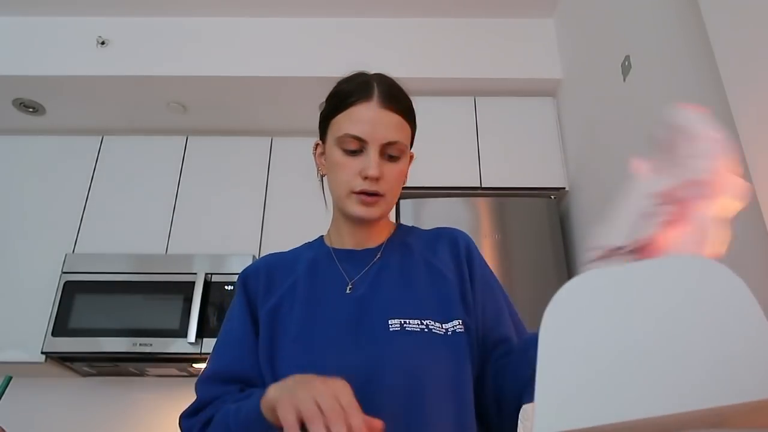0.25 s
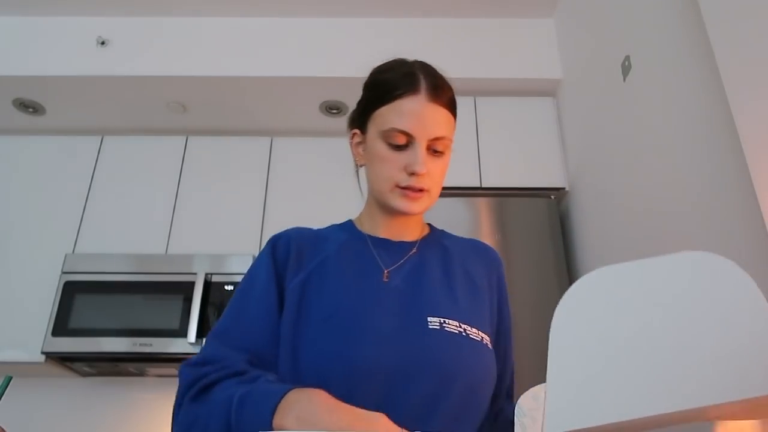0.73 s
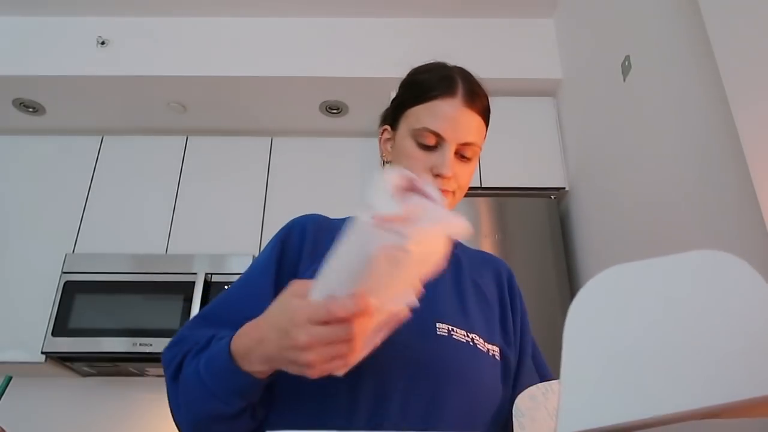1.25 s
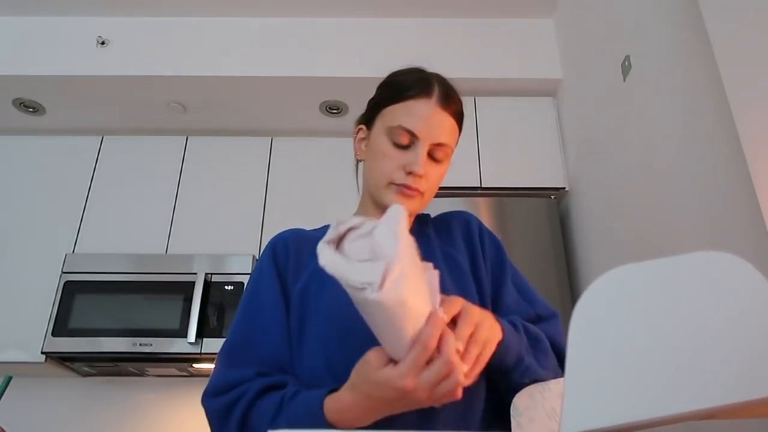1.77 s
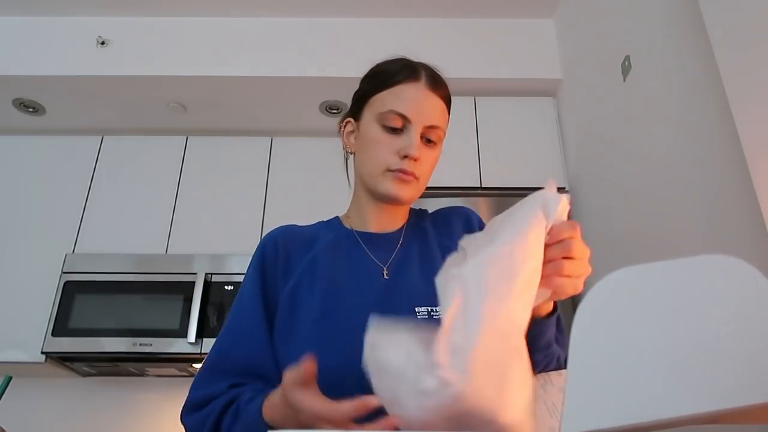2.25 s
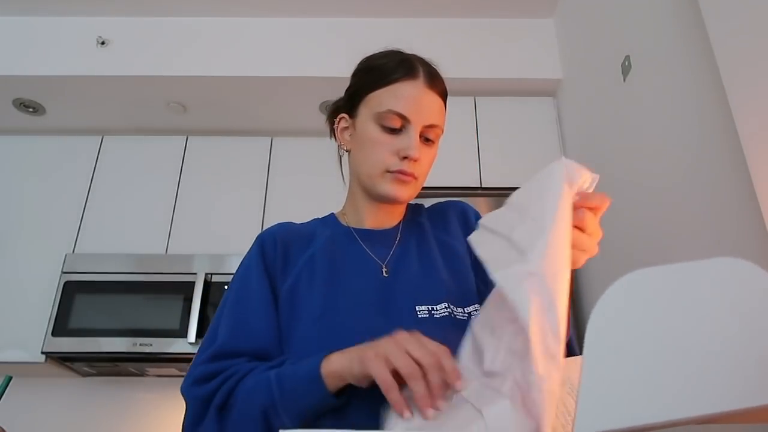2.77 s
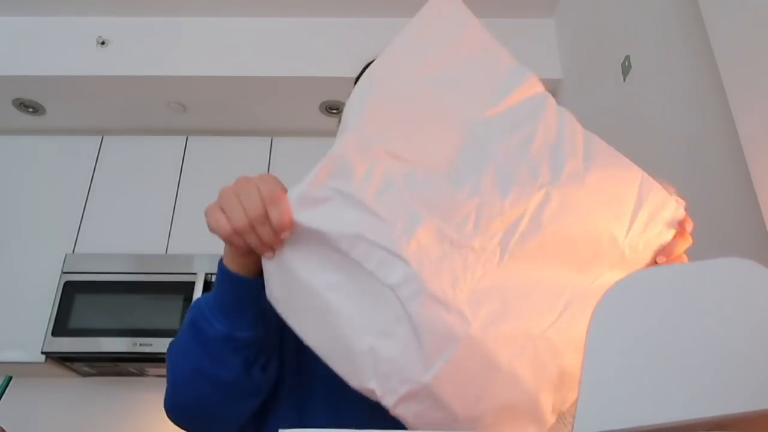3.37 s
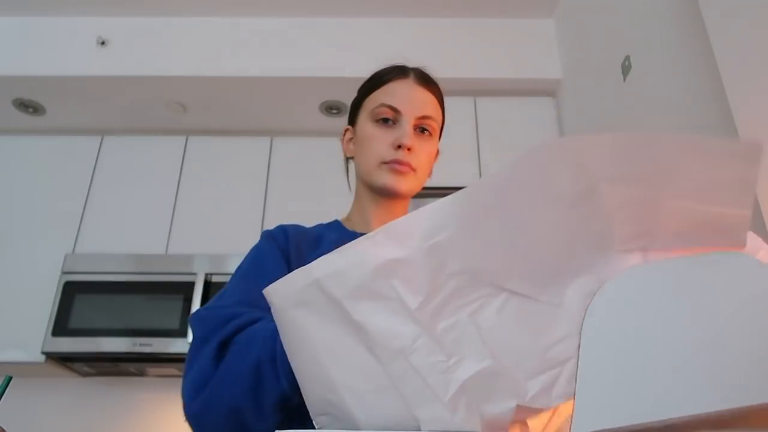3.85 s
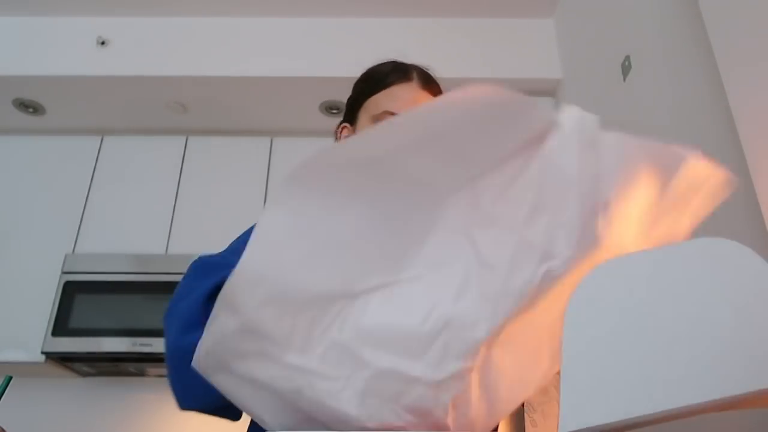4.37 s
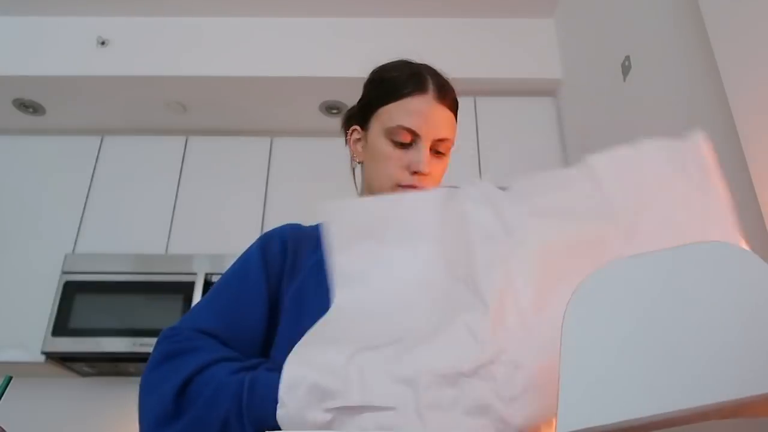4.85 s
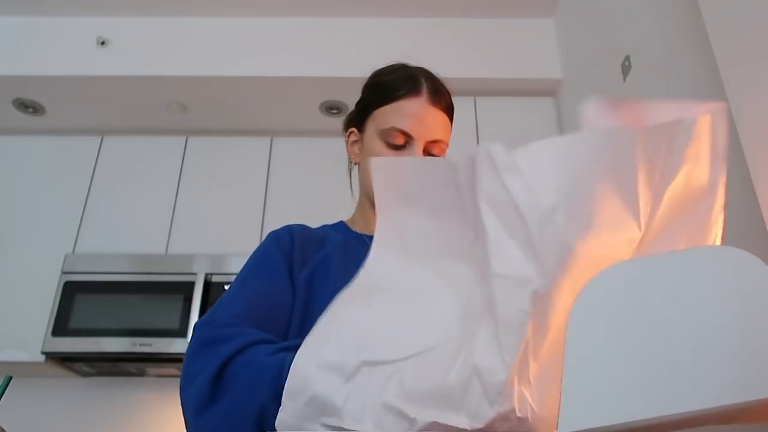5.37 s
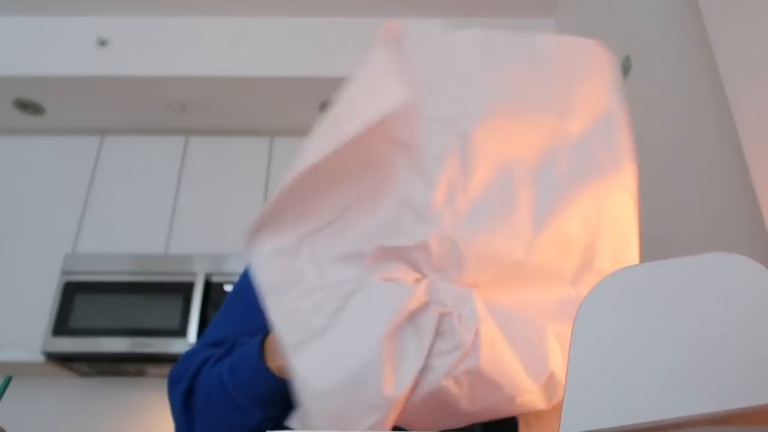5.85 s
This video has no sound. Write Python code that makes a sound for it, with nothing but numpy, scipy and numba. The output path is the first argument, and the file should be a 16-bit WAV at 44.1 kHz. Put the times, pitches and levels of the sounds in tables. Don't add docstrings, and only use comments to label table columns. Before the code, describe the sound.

Crisp paper crinkling in a small hard-walled kitchen, recorded close in stereo on a phone. Uneven bursts of crackle and fine fizz start with a grip and lift, thicken into loud crumpling with ringing crease snaps, then turn to wide sheet flapping, hollow pops and a faint box knock. It thins to sparse ticks, then another balling burst. Steady low refrigerator and ventilation noise fills the gaps.

```python
import sys
import numpy as np
from scipy import signal
from scipy.fft import rfft, irfft, next_fast_len
from scipy.io import wavfile
from scipy.ndimage import uniform_filter1d
from numba import njit

SR = 44100
rng = np.random.default_rng(int(sys.argv[2]) if len(sys.argv) > 2 else 0)


def magnitude_from_level(level_db):
    exponent = np.asarray(level_db, float) / 20
    return 10 ** exponent


def pcm_store(signal):
    levels = np.round(np.clip(np.atleast_2d(signal), -1, 1) * 32767)
    wavfile.write(sys.argv[1], SR, levels.astype(np.int16).T)


N = 269583


def on_log(table, hz):
    point_hz, value = np.transpose(table)
    return np.interp(np.log(np.maximum(hz, 1)), np.log(point_hz), value)


def shape(x, table, rule):
    size = next_fast_len(N)
    gain = rule(on_log(table, np.fft.rfftfreq(size, 1 / SR)))
    return irfft(rfft(x, size) * gain, size)[..., :N]


def unit(x):
    return x / np.sqrt(np.mean(x ** 2))


def walk(rate_hz):
    hold = int(SR / rate_hz)
    return uniform_filter1d(np.repeat(rng.standard_normal(N // hold + 1), hold), hold)[:N]


@njit
def ring(n, start, pole, size, place):
    out = np.zeros((2, n))
    for g in range(len(start)):
        fade = 1 - abs(pole[g])
        push, y, z = size[g] * fade ** 2 * np.e ** 2 / 2 + 0j, 0j, 0j
        for i in range(start[g], min(n, start[g] + int(11 / fade))):
            z = z * pole[g] + y
            y = y * pole[g] + push
            push *= pole[g]
            out[0, i] += z.imag
            out[1, i] += z.imag * place[g]
    return out


def grains(s, hz, t60_s, size):
    hz = np.clip(hz, 40, SR / 2.4)
    pole = np.exp(2j * np.pi * hz / SR - 1.764 * np.log(1000) / (t60_s * SR))
    return ring(N, (s * SR).astype(np.int64), pole, size, rng.standard_normal(len(hz)))


def kitchen():
    # frequency in Hz, level in dB per Hz.
    air_spectrum = [(18, -56), (30, -49), (222, -4), (364, -2), (716, -17.5), (905, -7), (3500, -28),
                    (4200, -26), (4540, -42), (10200, -80), (15000, -69)]
    # frequency in Hz, level in dB rms.
    hum_lines = [(73, -66), (118.4, -59), (215.3, -56.5)]
    air_db = -41.5 + 0.87 * walk(3.05)
    air = unit(shape(rng.standard_normal((2, N)), air_spectrum, magnitude_from_level)) * magnitude_from_level(air_db)
    t = np.arange(N) / SR
    hum = 0
    for hz, db in hum_lines:
        hum = hum + np.sqrt(2) * magnitude_from_level(db + 3.2 * walk(14)) * np.sin(2 * np.pi * hz * t)
    return air + hum


def gestures(table, rise_db_s, fall_db_s):
    rest_db, rest_rel_db = -45.5, -11
    t = np.arange(N) / SR
    power = magnitude_from_level(2 * rest_db) * magnitude_from_level([[0], [2 * rest_rel_db]])
    for s, hold_s, db, rel_db in table:
        rise_db = rise_db_s * np.maximum(s - t, 0)
        fall_db = fall_db_s * np.maximum(t - s - max(hold_s, 0), 0)
        power = power + magnitude_from_level(2 * (db - rise_db - fall_db)) * magnitude_from_level([[0], [2 * rel_db]])
    return np.sqrt(power)


def rustle(crackle, fizz, flap, fold):
    # low and high pitch in Hz, grains per s, cycles to fade,
    # size scatter in dB, bunching in dB, patch share 0-1.
    families = [
        (1619, 4960, 2600, 16.6, -0.2, -0.1, 0.25),
        (100, 650, 900, 5, 1.2, 1.2, .15),
        (675, 1544, 1200, 8.8, 2, -1.5, 0.34),
        (4440, 15160, 8000, 30, -0.5, 1.3, 0.43),
    ]
    # frequency in Hz, level in dB per Hz.
    paper_spectrum = [(47, -55), (80, 5), (124, -30), (252, -66), (287, -2.5), (314, -14), (477, -1),
                      (845, -2.5), (1570, -2), (3100, 1), (7490, -8), (10500, -15), (12400, -16),
                      (15500, -29)]
    # time in seconds, favoured pitch in Hz.
    facet_pitch = [(0.0, 2570), (0.19, 2730), (0.25, 1820), (0.32, 3500), (0.42, 1910), (0.52, 3220),
                   (0.85, 1890), (1.54, 2610), (1.63, 3400), (2.33, 3130), (2.44, 2520), (3.14, 3400),
                   (3.74, 2520), (5.54, 2350), (5.64, 1930), (5.67, 2920), (5.74, 3330), (6.1, 3300)]
    facet_db, facet_octaves = 4, 0.96
    burst_db = 2.4 * walk(24)
    out = 0
    for row, gain in zip(families, [crackle, flap, fold, fizz]):
        lo_hz, hi_hz, rate, cycles, scatter_db, bunch_db, patch = row
        when, where, big, long = rng.random((50000, 4))[:int(rate * N / SR)].T
        at = (when * (N - 1)).astype(int)
        hz = lo_hz * (hi_hz / lo_hz) ** where
        focus = .5 + 0.32 * np.tanh(3.2 * walk(45))[at]
        patch_db = 18 * patch * np.exp(-((where - focus) / 0.12) ** 2)
        if lo_hz < 2000 < hi_hz:
            off = np.log2(hz / np.interp(at / SR, *np.transpose(facet_pitch))) / facet_octaves
            patch_db = patch_db + facet_db * np.exp(-off ** 2)
        db = on_log(paper_spectrum, hz) + 10 * np.log10(hz) - scatter_db * np.log(1 - big) + patch_db
        size = magnitude_from_level(db + (burst_db + bunch_db * walk(13))[at])
        plain = grains(at / SR, hz, cycles * (.5 + long) / hz, size)
        out = out + plain / np.std(plain[0]) * gain
    return out


def chance_creases(crackle):
    rate_per_s, rel_db, mid_hz, fizz_db = 8, 10.5, 2900, -41
    when, big, high = rng.random((int(rate_per_s * N / SR), 3)).T
    at = (when * (N - 1)).astype(int)
    db = 20 * np.log10(crackle[at]) + rel_db + 6 * (big - .5)
    hz = mid_hz * 2 ** (1.614 * (high - .5))
    return list(zip(at / SR, db, hz, fizz_db + 0 * db))


def snaps(crackle):
    # time in seconds, peak in dB, pitch in Hz, fizz in dB re peak.
    single = [(0.185, -12, 2830, -29), (0.2448, -9.5, 1840, -41), (0.3047, -13, 2900, -21),
              (0.429, -10, 1760, -24), (0.5202, -8.5, 3740, -11), (0.854, -7.5, 1770, -26),
              (0.9556, -16, 1940, -42), (1.0795, -5, 1900, -34), (1.272, -0.5, 2020, -41),
              (1.3269, -11, 3510, -15), (1.7265, -7, 4200, -28), (1.75, -8, 3440, -38),
              (1.7928, -7.5, 3900, -19), (1.8198, -2, 3360, -29), (1.8616, -3, 3470, -28),
              (1.9365, 0, 3190, -23), (1.9808, -1.5, 3270, -12), (2.1376, 1.5, 3500, -34),
              (2.181, 3.5, 3260, -28), (2.5563, -4.5, 2530, -41), (2.709, -4.5, 3300, -18),
              (2.7444, -8, 2790, -23), (2.933, -5, 3980, -28), (2.9753, 0.5, 3470, -40),
              (3.0016, 4, 3180, -22), (3.1787, 3.5, 3160, -42), (3.223, 0.5, 3260, -48),
              (3.9059, 0.5, 2900, -20), (5.9891, -3, 2200, -14), (6.067, -13, 1670, -35)]
    faint = [(0.3745, -17.5, 2460, -35), (1.7714, -15, 3400, -26), (1.8844, -24, 3640, -18),
             (2.2438, -8, 3200, -14), (2.6226, -14, 3460, -9), (3.573, -6.5, 3520, -26),
             (4.2794, -7.5, 2520, -5), (4.8993, -11, 2460, 0), (5.0292, -26, 2240, -29),
             (5.21, -39, 2420, -10), (5.4294, -16, 3360, -3), (5.4887, -22, 1780, -15),
             (5.749, -5, 3600, -16), (5.9207, -14, 2010, -28), (6.084, -13, 1690, -35)]
    # time in seconds, peak in dB, pitch in Hz.
    thick = [(0.065, -12, 3160), (0.3123, -8, 3530), (0.6475, -20, 1940), (0.8007, -16, 1880),
             (1.01, -3.5, 3270), (1.04, -8, 2460), (1.131, -12, 2600), (1.618, -17, 3200),
             (1.964, -9, 3450), (2.042, -8, 4200), (2.106, 0.5, 3650), (2.1932, -3, 3470),
             (2.286, 0.5, 3060), (2.5925, -13, 2440), (2.867, -2, 2610), (3.058, -8, 2490),
             (3.1168, -5, 3600), (3.289, -8, 3050), (3.3143, -1, 3430), (3.358, -1.5, 3000),
             (3.62, -3, 2600), (3.6454, -4, 2400), (6.0333, -9, 3800)]
    shaken = [(3.9983, -13, 2100), (4.0556, -0.5, 3280), (4.1279, -3.5, 2440), (4.1763, -19, 1700),
              (4.1938, -4, 3160), (4.2272, -15, 2460), (4.346, -17, 2000), (4.5026, -8, 3150),
              (4.558, -16, 3130), (4.6127, -5, 2250), (4.6737, -11, 1930), (4.7805, -23, 1780),
              (4.8084, -9, 3740), (4.8199, -10, 2860), (4.8423, -12, 3040), (4.8648, -6, 2000),
              (4.8907, -11, 2480)]
    balled = [(5.3103, -19, 2140), (5.3493, -12.5, 2000), (5.3637, -17, 2060), (5.3991, -16, 2600),
              (5.439, -13, 3400), (5.4849, -19, 1810), (5.5513, -17, 3440), (5.635, -11, 1760),
              (5.6615, -13, 3440), (5.679, -5, 3960), (5.6884, -9, 1940), (5.7256, -1, 3750),
              (5.798, -9, 3230), (5.8604, -25, 2060), (5.879, -21, 1670), (5.9204, -22, 2070),
              (5.9892, -11, 2290), (6.0316, -3.5, 3650), (6.0671, -13, 2200), (6.0821, -9, 1670)]
    lifted = [(0.5224, -16, 3970), (0.6466, -18, 1990), (0.6974, -8, 2030), (0.7882, -10, 2000),
              (0.801, -20, 1980), (0.815, -9, 3080), (0.8338, -9, 1770), (0.854, -16, 1760),
              (0.907, -15, 1830), (0.955, -22, 1900), (0.977, -14, 2130), (0.994, -13, 1770)]
    plain_fizz_db = -18
    plain = [(*row, plain_fizz_db) for row in [*thick, *shaken, *balled, *lifted]]
    s, db, hz, fizz_db = np.transpose([*single, *faint, *plain, *chance_creases(crackle)])
    out = grains(s + .0006, hz, 17 / hz, magnitude_from_level(db - 7.0))
    for _ in range(7):
        late, off, high = rng.random((len(s), 3)).T
        near_s, near_hz = s + .015 * late ** 1.2 - .0015, hz * 2 ** (0.91 * off - .4)
        out += grains(near_s, near_hz, 25 / hz, magnitude_from_level(db - 14.0 - 6.9 * late))
        fizz_s, fizz_hz = s + 0.0088 * late ** 1.1, 6000 * 2 ** (0.99 * high)
        out += grains(fizz_s, fizz_hz, 0.0023 + 0 * s, magnitude_from_level(db + fizz_db - 11.0))
    return out


def sparks():
    # time in seconds, peak in dB.
    facet_sparks = [(0.406, -26), (0.431, -16), (0.5267, -6), (0.534, -12), (0.6469, -21), (0.6848, -23),
                    (0.7996, -8), (0.8061, -19), (0.9767, -29), (1.0056, -17), (1.039, -12), (1.6227, -29),
                    (1.7265, -20), (1.8193, -15), (1.864, -25), (1.8916, -21), (1.9255, -23), (1.9759, -7),
                    (2.0507, -19), (2.1126, -17), (2.1735, -23), (2.2432, -4.5), (2.2872, -9), (2.396, -15),
                    (2.4079, -11.5), (2.601, -19), (2.8135, -32), (2.825, -10), (2.8539, -15), (2.933, -11),
                    (3.0565, -27), (3.1762, -23), (3.3144, -23), (3.6456, -9), (3.9025, -17), (3.936, -18),
                    (4.0038, -25), (4.0243, -19), (4.0512, -18), (4.1275, -14), (4.2158, -18),
                    (4.2762, -11), (4.348, -13), (4.5032, -17), (4.5605, -21), (4.633, -12), (4.7381, -29),
                    (4.8379, -14), (4.8653, -18), (4.899, -16), (5.029, -25), (5.3842, -22), (5.3966, -13),
                    (5.53, -16), (5.6865, -12), (5.7164, -19), (5.882, -15), (5.9893, -18)]
    s, db = np.transpose(facet_sparks)
    out = 0
    for _ in range(7):
        late, high = rng.random((len(s), 2)).T
        hz = 5000 * 2 ** (1.4 * high)
        out = out + grains(s + .008 * late ** 1.5, hz, 0.0016 + 0 * s, magnitude_from_level(db - 4 - 12 * high))
    return out


def pops():
    # time in seconds, peak in dB, pitch in Hz, air thump in dB re peak.
    panel_pops = [(0.431, -14, 720, -39), (0.519, -17, 670, -28), (0.676, -30, 697, -32),
                  (0.806, -13, 675, -34), (0.955, -21, 533, -36), (0.995, -7.5, 530, -44),
                  (1.274, -20, 950, -25), (1.794, -25, 880, -23), (2.142, -9.5, 587, -41),
                  (2.265, -14, 575, -33), (2.387, -3.5, 603, -4.5), (2.778, -17.5, 606, -34),
                  (2.798, -11, 633, -30), (3.298, -13.5, 522, -41), (3.608, -15, 774, -22),
                  (3.633, -12, 940, -11), (3.932, -15.5, 510, -10), (4.054, -14, 380, -27),
                  (4.093, -5, 294, -28), (4.215, -10, 308, -8), (4.427, -6.5, 750, -26),
                  (4.562, -9.5, 906, -28), (4.586, -9, 340, -34), (4.779, -22.5, 427, -18),
                  (4.835, -11.5, 480, -36), (4.932, -15, 448, -33), (5.1, -6, 584, -27),
                  (5.381, -5, 585, -18), (5.512, -14.5, 524, -21), (5.686, -12, 534, -46)]
    # time in seconds, peak in dB, pitch in Hz.
    fold_thuds = [(0.651, -11, 641), (0.677, -8, 756), (0.699, -12, 610), (0.819, -11, 511),
                  (0.834, -7.5, 530), (0.854, -21, 1520), (0.928, -11, 450), (1.009, -12, 540),
                  (1.033, -11.5, 540), (1.049, -13, 980), (1.083, -11, 754), (1.199, -16, 1380),
                  (3.659, -8, 530), (3.674, -15, 1460), (4.859, -5, 834), (4.879, -8, 842),
                  (4.899, -9, 778), (5.207, -16, 716), (5.408, -11, 560), (5.539, -11.5, 1110),
                  (5.562, -13, 686), (5.63, -18, 755), (5.719, -17, 500), (5.816, -15, 1100)]
    # time in seconds, peak in dB, pitch in Hz, air thump in dB re peak.
    box_knock = (4.088, -17, 290, -25)
    pop_t60_s, box_t60_s = 0.019, .156
    thuds = [(s, db - 4, hz, -40) for s, db, hz in fold_thuds]
    s, db, hz, thump_db = np.transpose([*panel_pops, *thuds, box_knock])
    out = grains(s, hz, np.append(pop_t60_s + 0 * s[1:], box_t60_s), magnitude_from_level(db - 1.5))
    out += grains(s, 150 + 0 * s, 0.027 + 0 * s, magnitude_from_level(db + thump_db - 5.0))
    for _ in range(4):
        late, off = rng.random((len(s), 2)).T
        near_hz = hz * 2 ** (1.97 * off - 1.1)
        out += grains(s + 0.015 * late ** 1.478, near_hz, 0.018 + 0 * s, magnitude_from_level(db - 12.0))
    return out


def cracks():
    # time in seconds, peak in dB, pitch in Hz.
    dry_cracks = [(0.956, -26, 1890), (1.0104, -2, 2000), (1.0924, 1.5, 2220), (1.1474, -5, 2400),
                  (1.1982, -4, 2000), (1.2337, -2, 3300), (1.258, -9, 1790), (1.329, -9, 3650),
                  (1.3778, -18, 3350), (1.561, -27, 1870), (1.7495, -18, 3460), (1.8018, -6, 2160),
                  (1.847, -17, 3700), (1.8622, -9, 3210), (1.8912, -8, 2130), (2.0509, 0.5, 3120),
                  (2.2678, -7, 3090), (2.407, -3, 3390), (2.804, -1, 3100), (2.819, -2, 1930),
                  (3.056, -7, 1970), (3.845, -20, 2730), (3.9367, -6, 2420), (4.023, -13, 2420),
                  (4.347, -17, 2010), (4.502, -8, 3210), (4.7374, -18, 1890), (4.78, -16, 3960),
                  (4.8444, -27, 1890), (4.8816, -11, 2210), (5.0026, -7, 1930), (5.112, -12, 2760),
                  (5.2114, -40, 2220), (5.2714, -28, 2010), (5.2944, -23, 2980), (5.3154, -15, 2980),
                  (5.4094, -18, 2470), (5.4444, -24, 3350), (5.5644, -22, 2480), (5.6344, -12, 1780),
                  (5.6964, -15, 1870), (6.066, -8, 1710)]
    fade_cycles, level_db = 6.6, -5.5
    s, db, hz = np.transpose(dry_cracks)
    out = 0
    for octave, rel_db in [(-0.1, -2.5), (-0.62, -6.0), (0.18, -4.0)]:
        late, off = rng.random((len(s), 2)).T
        near_hz = hz * 2 ** (octave + 0.1 * (off - .5))
        out = out + grains(s + 0.00099 * late, near_hz, fade_cycles / near_hz, magnitude_from_level(db + level_db + rel_db))
    return out


def room(x):
    t60_s, level_db, damp_hz = 0.36, -12.5, 5070
    t = np.arange(int(.5 * SR)) / SR
    noise = rng.standard_normal((2, len(t)))
    dull = signal.lfilter(*signal.butter(1, damp_hz, fs=SR), noise)
    tail = (dull + (noise - dull) * np.exp(-t / 0.037)) * magnitude_from_level(-60 * t / t60_s) * (t > .004)
    tail = tail * magnitude_from_level(level_db) / np.sqrt(np.sum(tail[0] ** 2))
    return np.array([signal.fftconvolve(x, h)[:N] for h in tail])


def ports(shared, loose):
    # frequency in Hz, left lead in rad.
    phase_gap = [(100, -.02), (1000, -.1), (3800, -.45), (6400, -1.1), (9300, -1.3), (15000, -1.5)]
    # frequency in Hz, level in dB.
    unshared = [(60, -36), (400, -28), (1300, -22), (3000, -14), (6800, -2), (10000, 1), (15000, 1.5)]
    left_db = -1
    side = shape(loose, unshared, magnitude_from_level)
    left = shape(shared, phase_gap, lambda gap: np.exp(.5j * gap)) + side
    right = shape(shared, phase_gap, lambda gap: np.exp(-.5j * gap)) - side
    return np.array([left * magnitude_from_level(left_db / 2), right * magnitude_from_level(-left_db / 2)])


def scene():
    # start in seconds, hold in seconds, crackle in dB, fizz in dB re crackle.
    crumples = [(0.0, 0.081, -20, -9), (0.31, 0.011, -36, -8), (0.44, 0.0011, -26, 0.5),
                (0.4, 0.02, -42, -13), (0.54, 0.7, -31.5, -26), (1.265, 0.029, -27, -12),
                (0.55, 0.013, -25.5, 3), (0.65, 0.059, -22, 0), (0.8, 0.051, -23, -5),
                (0.98, 0.088, -22.5, -5.5), (1.07, 0.11, -24, -13), (1.63, 0.021, -38.5, -9),
                (1.75, 0.0042, -39.5, 4.5), (1.855, 0.024, -21.5, -4.5), (1.93, 0.51, -22, -6.5),
                (2.14, 0.16, -21, -6.5), (2.57, 0.065, -32.5, -15), (2.72, 0.25, -31.5, -9),
                (2.82, 0.55, -26, -22), (2.83, 0.064, -19.5, -7.5), (2.94, 0.1, -18.5, -7),
                (3.2, 0.047, -18.5, -10.5), (3.29, 0.042, -16, -11.5), (3.485, 0.027, -29.5, -12),
                (3.555, 0.04, -31, -20), (3.58, 0.017, -25.5, -9), (3.62, 0.054, -21.5, -13.5),
                (3.69, 0.024, -30, -16), (3.93, 2.7, -33, -12), (3.93, 0.034, -21, -9.5),
                (4.0, 0.16, -20, -4.5), (4.19, 0.11, -19.5, -7), (4.34, 0.11, -19.5, -5.5),
                (4.49, 0.027, -24, -5), (4.56, 0.11, -16.5, -6.5), (4.8, 0.036, -25, -11),
                (4.85, 0.089, -18, -8), (5.02, 0.0088, -27, -13), (5.11, 0.0092, -27.5, -10),
                (5.27, 0.05, -36.5, 0), (5.44, 0.12, -32.5, -5.5), (5.15, 0.067, -36.5, -7.5),
                (5.37, 0.028, -24.5, -8), (5.63, 0.028, -29.5, -6), (5.685, 0.048, -20, -7),
                (5.75, 0.088, -23.5, -10.5), (5.86, 0.043, -29, -16), (5.92, 0.015, -23, -12),
                (5.985, 0.031, -19.5, -15.5), (6.07, 0.04, -22.5, -19)]
    # start in seconds, hold in seconds, panel flap in dB, fold in dB re flap.
    swings = [(0.0, 0.017, -25.5, 0.5), (0.435, 0.003, -25.5, -7), (0.53, 0.68, -40, 8),
              (0.655, 0.033, -23.5, 3), (0.81, 0.045, -28, 4.5), (0.97, 0.081, -26, 6),
              (1.1, 0.09, -40, 16.5), (1.265, 0.023, -41.5, 13.5), (1.62, 0.018, -37.5, -9),
              (1.8, 0.68, -35, 2.5), (2.05, 0.023, -25.5, 0.5), (2.145, 0.011, -24.5, 6.5),
              (2.265, 0.027, -30.5, 9.5), (2.395, 0.0067, -17.5, 1), (2.58, 0.21, -45.5, 2),
              (2.785, 0.26, -30, 0.5), (2.8, 0.12, -29, 6), (3.17, 0.15, -36.5, 1.5),
              (3.3, 0.005, -32.5, 7.5), (3.615, 0.058, -30, 3.5), (3.935, 0.377, -23.5, -1),
              (4.05, 2.4, -32.5, 0.5), (4.37, 0.12, -27.5, 2), (4.56, 0.098, -19.5, -3.5),
              (4.79, 0.02, -33, -8), (4.835, 0.02, -20.5, -0.5), (4.87, 0.065, -22.5, 0),
              (5.105, 0.019, -41.5, 13.5), (5.385, 0.0079, -23, -2.5), (5.51, 0.046, -29.5, 2),
              (5.63, 0.039, -28, -1), (5.68, 0.05, -22, -1), (5.78, 0.025, -26, -2)]
    crackle, fizz = gestures(crumples, rise_db_s=438, fall_db_s=250)
    flap, fold = gestures(swings, rise_db_s=473, fall_db_s=244)
    paper = magnitude_from_level(-1.0) * rustle(crackle, fizz, flap, fold)
    paper = paper + snaps(crackle) + sparks() + pops() + cracks()
    low_cut = signal.butter(2, 158, "high", fs=SR, output="sos")
    paper = signal.sosfilt(low_cut, paper)
    shared, loose = paper + room(paper[0]) + kitchen()
    return ports(shared, loose)


def top_cut(x):
    return signal.sosfilt(signal.butter(12, 15840, fs=SR, output="sos"), x)


def record(dry):
    ceiling = .95
    mix = ceiling * np.tanh(dry / ceiling)
    return top_cut(mix)


dry = scene()
out = record(dry)
pcm_store(out)
```